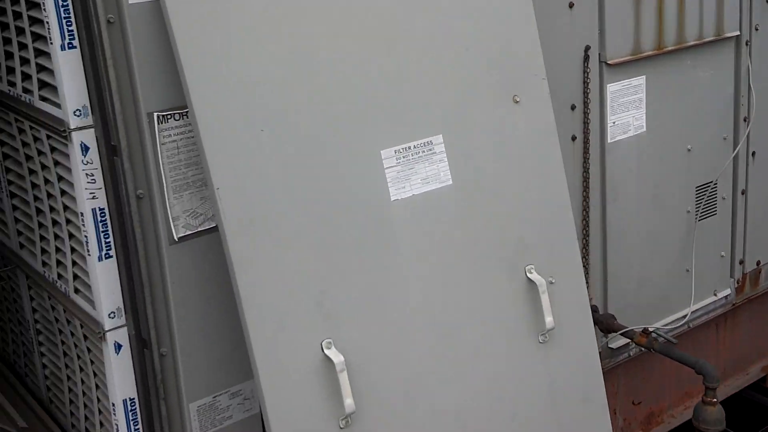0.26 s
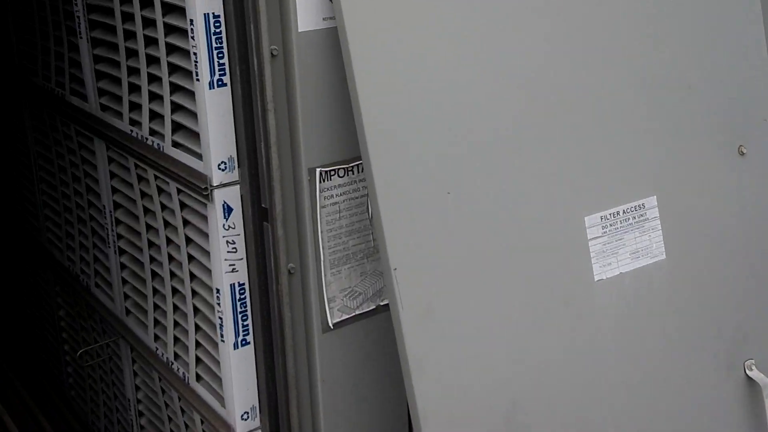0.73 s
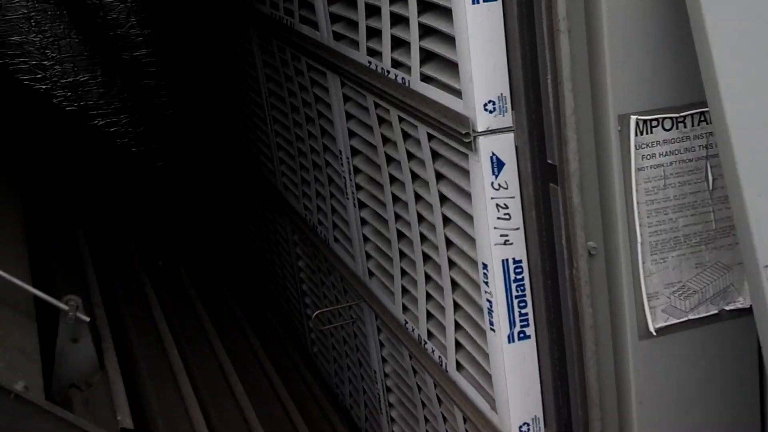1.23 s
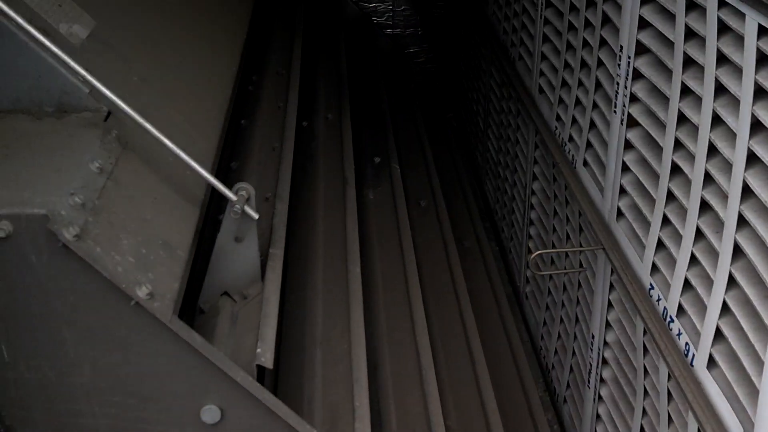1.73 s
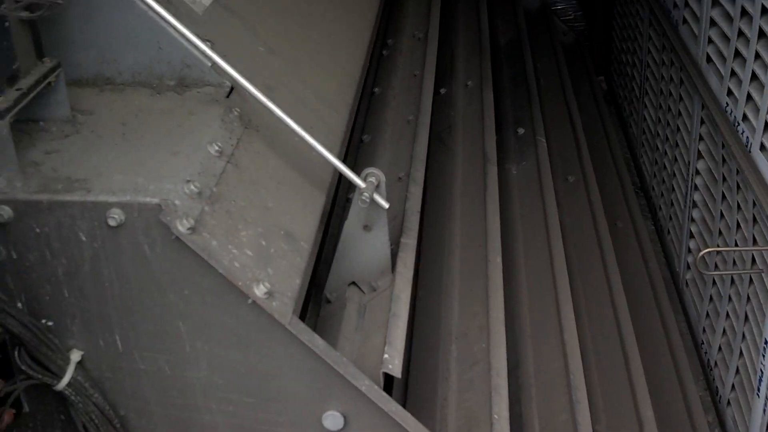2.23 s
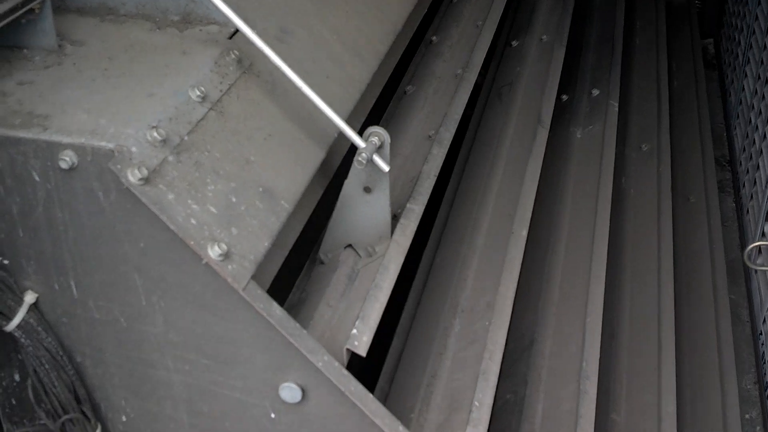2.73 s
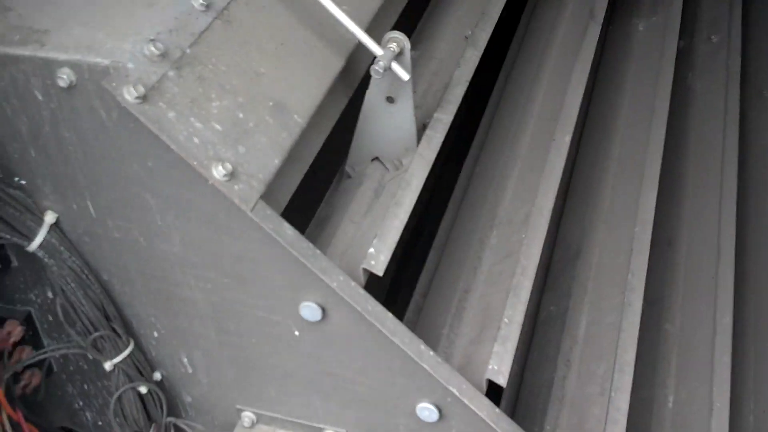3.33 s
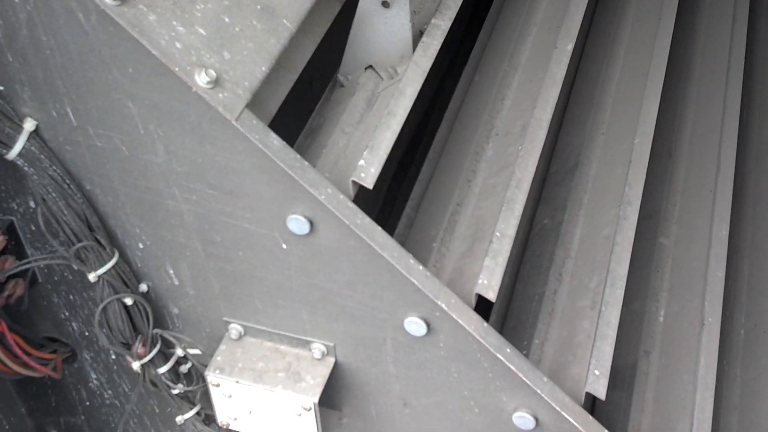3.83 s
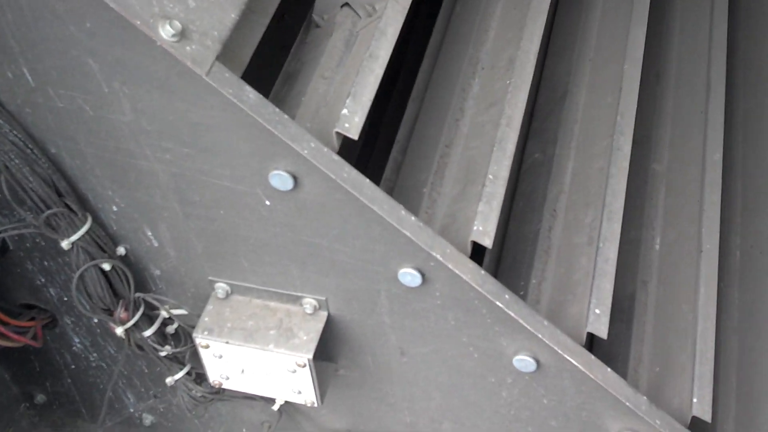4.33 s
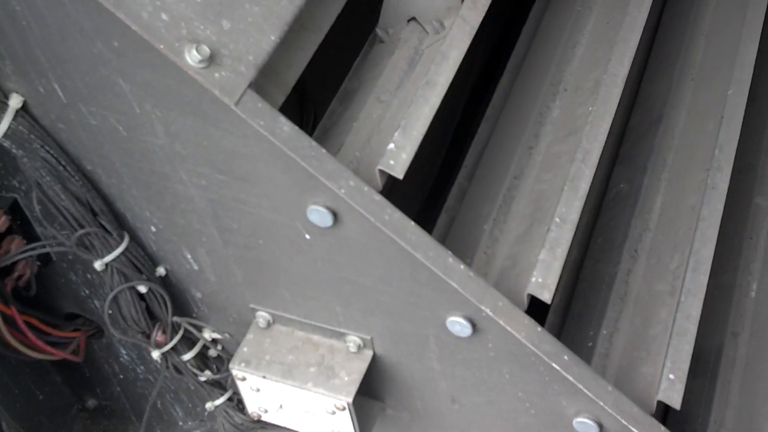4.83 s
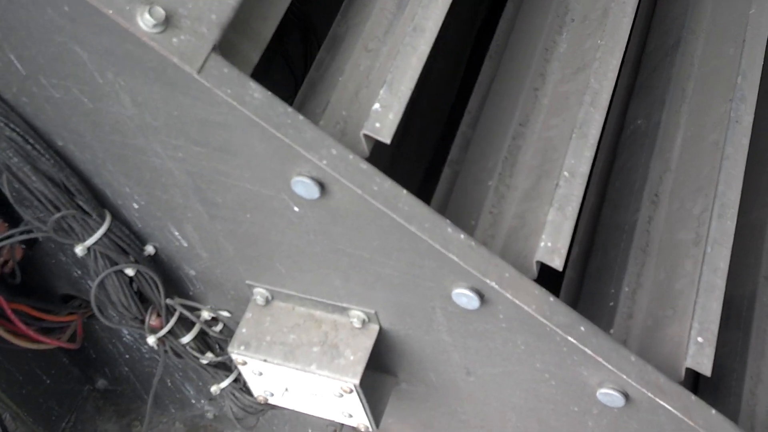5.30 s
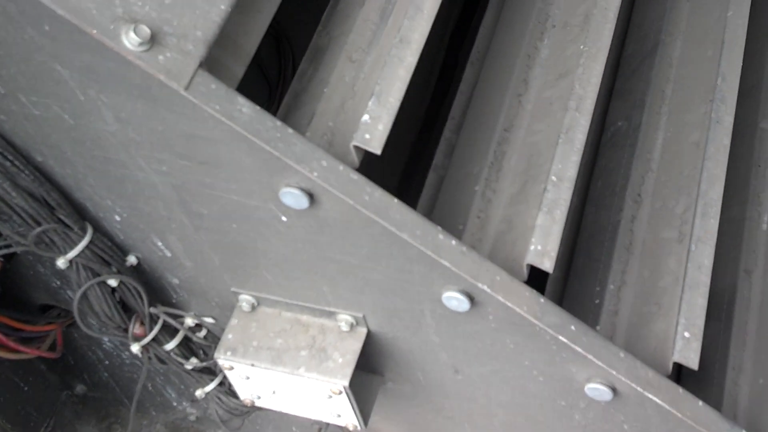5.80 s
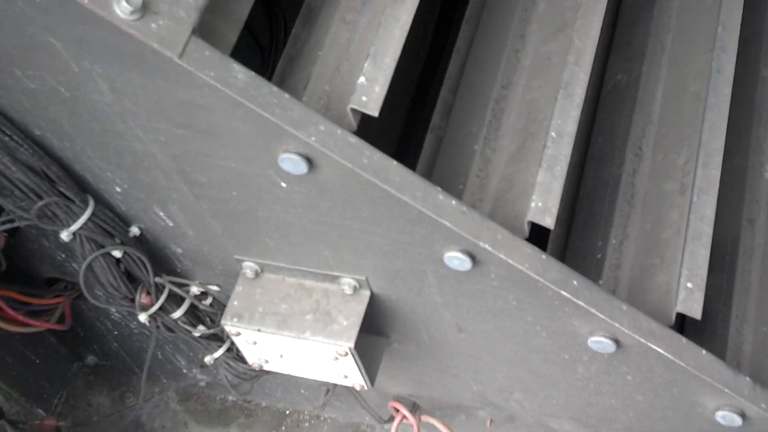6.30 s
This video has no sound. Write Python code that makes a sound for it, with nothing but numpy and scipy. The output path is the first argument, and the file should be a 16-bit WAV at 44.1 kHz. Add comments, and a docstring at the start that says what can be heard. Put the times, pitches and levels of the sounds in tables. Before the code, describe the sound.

Steady machine noise from an air conditioning unit outdoors, heard very close with a handheld stereo microphone. The hollow tone at the start fades while hums and whines swell and shift from side to side. Air rushes through filters and metal dampers with fine hiss. Low wind bumps hit the right side throughout, becoming dense, ragged and popping in the last second and a half; bass is rather thin.

```python
"""A rooftop air conditioner runs steadily while a two-port microphone moves into its open filter bay.
Air, as shaped noise, roars and hisses through filters and dampers; blower and motor are wavering tones
whose levels follow standing waves. The draught buffets the ports with low noise thuds and sharp pops.
A limiter ducks the machine after each loud buffet and lets it swell back; a stereo widener thins the bass."""
import sys
import numpy as np
from scipy import signal
from scipy.fft import rfft, irfft
from scipy.io import wavfile
from scipy.ndimage import uniform_filter1d

SR = 44100
rng = np.random.default_rng(int(sys.argv[2]) if len(sys.argv) > 2 else 0)


def digitize_waveform(pressure):
    """Quantize a signal to 16-bit integers and store it at the path in sys.argv[1].

    Rows of a 2-D input are taken as channels; values are limited to [-1, 1].
    """
    field = np.atleast_2d(pressure).T
    bounded = np.clip(field, -1, 1)
    quanta = np.round(bounded * 32767).astype(np.int16)
    wavfile.write(sys.argv[1], SR, quanta)


N = 288855
TIME, FREQS = np.arange(N) / SR, np.fft.rfftfreq(N, 1 / SR)
LIMITER_WINDOW = 353  # samples, about 8 ms


def amp(db):
    """Decibels to gain."""
    return 10 ** (np.asarray(db) / 20)


def unit(x):
    """Scales to rms 1."""
    return x / np.sqrt(np.mean(x ** 2) + 1e-20)


def curves(rows):
    """Draws each column of a time table as a line over every sample."""
    s, *columns = np.transpose(rows)
    return [np.interp(TIME, s, column) for column in columns]


def over_hz(points):
    """Draws a frequency table over every bin, on a log frequency axis."""
    hz, value = np.transpose(points)
    return np.interp(np.log(FREQS + 1), np.log(hz + 1), value)


def colour(x, spectrum):
    """Filters white sound to the shape of a spectrum, keeping its power."""
    gain = unit(amp(over_hz(spectrum)))
    return irfft(rfft(x) * gain, N)


def white():
    """Unrelated white noise for each port."""
    return rng.standard_normal((2, N))


def wander(rate_hz):
    """Random drift of rms 1 for each port: noise kept below roughly rate_hz."""
    lowpass = np.exp(-(FREQS / rate_hz) ** 2) * (FREQS > 0)
    return unit(irfft(rfft(white()) * lowpass, N))


def related(alike, right_lead):
    """White noise at the two ports, partly shared, the right port ahead by a phase in radians."""
    left, stranger = rfft(white())
    alike = np.clip(alike, -1, 1)
    shared = alike * np.exp(1j * right_lead) * left
    right = shared + np.sqrt(1 - alike ** 2) * stranger
    return irfft([left, right], N)


def short_level(x):
    """Running rms over about 8 ms, as the limiter senses it."""
    return np.sqrt(abs(uniform_filter1d(x ** 2, LIMITER_WINDOW)) + 1e-12)


def tone(hz, shared, opposed, lead, db, waver_hz, tremble_db):
    """A strong machine tone; its opposed part leads by some radians, and moving air makes the whole tremble."""
    phase = 2 * np.pi * np.cumsum(hz + waver_hz * wander(3.5)[0]) / SR
    opposite_signs = np.array([[1], [-1]])
    ports = shared * np.cos(phase) + opposite_signs * opposed * np.cos(phase + lead)
    return np.sqrt(2) * amp(db + tremble_db * wander(29)[0]) * ports


# steady draught on the microphone, before the layer trims: time_s, level_db
DRAUGHT_LEVEL = [(0.0, -22), (0.55, -25.5), (1.1, -21), (1.4, -22.5), (1.7, -20.5), (2.2, -24.5),
                 (2.8, -23), (3.3, -25), (4.0, -26), (4.6, -22), (5.5, -18), (6.55, -18)]
# spectrum shape of the eddies' low rumble, also used by the buffets: frequency_hz, relative_db_per_hz
RUMBLE_SPECTRUM = [(10, -45), (25, -18), (45, -18.5), (65, -19), (90, -2.5), (130, -2), (220, -1.5),
                   (400, -12), (750, -32), (1500, -46.5), (8000, -85)]
# spectrum shape of the eddies' flutter, also used by the buffets: frequency_hz, relative_db_per_hz
FLUTTER_SPECTRUM = [(20, -42), (150, -20), (350, 4), (550, -1), (750, -12), (1150, -25), (1700, -25.5),
                    (3000, -65), (12000, -75)]


def draught(rumble_db=2.0, lump_db=2.5, flutter_db=-15, alike=0.55, right_lead=0.47):
    """Small eddies rumble on both ports all the time; the right port flutters more."""
    level = amp(curves(DRAUGHT_LEVEL)[0])
    lumps = amp(lump_db * wander(14.0))
    rumble = colour(unit(related(alike, right_lead) * lumps) * level, RUMBLE_SPECTRUM)
    flutter = colour(unit(white()) * level, FLUTTER_SPECTRUM)
    port_gain = amp([[-5], [2]])  # left, right
    return amp(rumble_db) * rumble + amp(flutter_db) * port_gain * flutter


# the strongest buffets; lengths under 6 ms play as 6 ms, and flutter is before its trim:
# centre_s, port (0 left, 1 right), length_s, thud_peak_db (8 ms level), flutter_db
BUFFETS = [(0.267, 1, 0.0073, -14, -22), (0.296, 1, .005, -9, -15), (0.611, 1, 0.0054, -10, -23.5),
           (0.636, 1, 0.0047, -20, -33), (0.698, 1, .005, -13, -30), (0.726, 1, 0.0051, -5, -28),
           (0.764, 1, 0.0097, -10, -31.5), (0.912, 1, 0.024, -10, -30), (0.962, 1, 0.0053, -8.5, -28),
           (1.045, 1, 0.0045, -14, -23), (1.118, 1, 0.0074, -4, -17), (1.175, 1, 0.0045, -9.5, -34),
           (1.264, 1, 0.0097, -7.5, -24.5), (1.289, 1, 0.0084, -14, -24), (1.316, 1, 0.011, -10.5, -11.5),
           (1.323, 0, 0.0093, -5.5, -11), (1.772, 1, .005, -31, -13), (1.803, 1, 0.0099, -9.5, -21),
           (1.948, 1, 0.0062, -15.5, -24), (2.109, 1, 0.0082, -12.5, -36), (2.308, 1, 0.037, -16.5, -18.5),
           (2.385, 1, 0.014, -14, -23), (2.447, 1, 0.0055, -11.5, -8.5), (2.489, 1, 0.0077, -7, -12),
           (2.554, 1, .005, -11, -10.5), (2.698, 1, 0.0035, -15, -23.5), (2.729, 1, 0.015, -12, -20),
           (2.76, 1, .015, -15, -17), (2.846, 1, 0.047, -11, -19), (2.881, 1, 0.017, -9, -20),
           (3.027, 1, 0.0071, -20, -15), (3.069, 1, 0.015, -20, -20), (3.14, 1, 0.0088, -5.5, -16),
           (3.213, 1, 0.012, -11, -21), (3.454, 1, 0.0055, -15, -28), (3.515, 1, 0.018, -16.5, -28),
           (3.633, 1, 0.0045, -14, -26), (3.668, 1, 0.0052, -8, -11), (3.895, 0, 0.008, -6, -18),
           (4.012, 1, .005, -6.5, -18), (4.046, 1, 0.0092, -9, -33), (4.15, 1, .005, -6.5, -36),
           (4.386, 1, 0.014, -7, -28), (4.459, 1, 0.045, -11, -18), (4.622, 1, 0.012, -7, -17.5),
           (4.729, 1, 0.0067, -2.5, -12), (4.758, 1, 0.0055, -15.5, -33), (4.797, 1, 0.0085, -9.5, -16),
           (4.92, 1, 0.047, -15, -19.5), (5.087, 1, 0.016, -9, -31), (5.146, 1, 0.021, -14, -28),
           (5.176, 1, 0.018, -4, -11), (5.224, 1, 0.019, -2, -5.5), (5.307, 1, 0.03, -6, -4),
           (5.37, 1, 0.014, -5.5, -15), (5.487, 1, 0.023, -13, -21), (5.545, 1, 0.024, -24, -15),
           (5.65, 1, 0.013, -10, -13), (5.766, 1, 0.007, 0, -4), (5.835, 1, 0.026, -19, -16),
           (5.959, 1, 0.006, -3.5, -5.5), (6.018, 1, 0.0025, -12, -14), (6.083, 1, 0.013, -9, -13),
           (6.093, 1, 0.013, -3, -5), (6.144, 1, 0.0065, -4, -18), (6.204, 1, 0.013, -10, -17),
           (6.287, 1, 0.0046, -7, -23), (6.314, 1, 0.018, -3.5, -10), (6.338, 1, 0.014, -7, -7),
           (6.365, 1, 0.0036, -7, -5.5), (6.421, 1, 0.0083, -14, -18), (6.479, 1, 0.0036, -11, -23),
           (6.532, 1, 0.018, -11, -16)]


def buffets(flutter_trim_db=-1, spike_db=4, tail_db=-14, tail_s=0.033, flutter_length=0.76):
    """Each larger eddy hits one port: a low thud with a ragged flutter on top, and a soft rumbling wake."""
    out = np.zeros((2, N))
    low = colour(white(), RUMBLE_SPECTRUM)
    ragged = colour(white() * amp(spike_db * wander(260)), FLUTTER_SPECTRUM)
    for s, port, length_s, thud_db, flutter_db in BUFFETS:
        side, near = int(port > .5), abs(TIME - s) < .15
        t = TIME[near] - s
        bell = 2 ** (-2 * (t / max(length_s, .006)) ** 2)
        wake = amp(tail_db) * (t > 0) * np.exp(-abs(t) / tail_s)
        thud = low[side, near] * np.maximum(bell, wake)
        thud = thud / short_level(thud).max()
        # the flutter's bell is a share of the thud's length
        shape = np.maximum(bell ** (1 / flutter_length ** 2), wake)
        flutter = unit(ragged[side, near] * shape) * np.sqrt(np.mean(shape ** 2))
        out[side, near] += amp(thud_db) * thud + amp(flutter_db + flutter_trim_db) * flutter
    return out


# sharp pops of air in the right port; level drives the swing before trim and envelope:
# start_s, level_db, pitch_hz
AIR_POPS = [(0.7188, 5, 820), (2.4325, -4, 590), (2.5002, 4, 726), (2.5552, 5, 500), (2.8741, 10, 536),
            (3.0607, 5.5, 680), (3.6567, -8, 640), (4.623, -7, 576), (4.7277, 0, 457), (5.203, -3, 330),
            (5.217, 8, 647), (5.231, 14, 590), (5.287, 11, 630), (5.3015, 9, 705), (5.333, 9, 520),
            (5.6414, 7.5, 750), (5.7651, 8.5, 525), (5.9122, 8, 540), (5.9554, 12.5, 806),
            (5.9614, 11, 453), (6.078, 12, 480), (6.0833, 9, 496), (6.0924, 14.5, 490), (6.2125, 9.5, 620),
            (6.304, 3, 580), (6.307, 12, 535), (6.3634, 10, 424), (6.3805, 8, 720), (6.3947, 8, 500),
            (6.4172, 5, 637), (6.516, 5, 680)]


def pops(trim_db=1.0, decay_s=0.00065, rise_s=0.00072):
    """An eddy breaks in the right port: a steep pressure swing that dies within a cycle or two."""
    out = np.zeros((2, N))
    t = np.arange(SR // 50) / SR
    envelope = np.exp(-t / decay_s) * (1 - np.exp(-(t / rise_s) ** 2))
    for s, level_db, hz in AIR_POPS:
        start = round(s * SR)
        swing = np.sin(2 * np.pi * hz * t) * envelope
        out[1, start:start + len(t)] += amp(level_db + trim_db) * swing
    return out


# brief spits of hiss, and at 1.3 s a knock and scrape as the microphone brushes the filter frame; level before
# the rise and fade: start_s, centre_hz, width_hz, fade_s, level_db
RUSTLES_AND_SPITS = [(0.63, 14630, 3000, .015, -53), (1.295, 1500, 1200, 0.041, -26), (1.32, 3700, 2200, .05, -37),
                     (1.672, 15200, 700, .012, -44), (1.72, 6500, 1200, 0.036, -51),
                     (1.725, 12000, 6000, 0.1, -53), (1.8, 13300, 6000, 0.023, -49),
                     (1.878, 14000, 6000, .02, -48), (1.95, 13500, 5000, 0.11, -54),
                     (2.16, 8500, 6000, 0.046, -45), (3.63, 7500, 3000, .025, -48), (4.43, 7500, 3000, .04, -48),
                     (5.69, 4000, 2500, .06, -42)]


def spits(rise_s=0.0052, grain_db=1.5, grain_hz=250):
    """Short grainy bursts, each in its own band: spits of hiss, and a knock and scrape at 1.3 s; a quick rise
    and a slower fade."""
    out = np.zeros((2, N))
    grains = rfft(white() * amp(grain_db * wander(grain_hz)[0]))
    for s, hz, width_hz, fade_s, level_db in RUSTLES_AND_SPITS:
        t = np.maximum(TIME - s, 0)
        band = unit(irfft(grains * np.exp(-2 * ((FREQS - hz) / width_hz) ** 2), N))
        out += amp(level_db) * band * np.minimum(t / rise_s, 1) * np.exp(-t / fade_s)
    return out


# one short swish that falls in pitch, level before the trims: time_s, centre_hz, level_db
SWISH_GLIDE = [(1.29, 9760, -71.5), (1.33, 8400, -36.5), (1.355, 7000, -42), (1.385, 5840, -35.5),
               (1.44, 5500, -60)]


def swish(trim_db=-3.5, width_hz=1900, grain_db=1.8):
    """A grainy band of hiss slides down, stronger at the left port: slow noise rides a falling carrier."""
    hz, level_db = curves(SWISH_GLIDE)
    sounding = (TIME > SWISH_GLIDE[0][0]) & (TIME < SWISH_GLIDE[-1][0])
    port_gain = amp([[2], [-2]])  # left, right
    level = amp(level_db + trim_db + grain_db * wander(110)[0]) * port_gain
    carrier = np.cos(2 * np.pi * np.cumsum(hz) / SR)
    return sounding * level * wander(width_hz) * carrier


# weaker tones of shafts, belt and motors, level before the trim: pitch_hz, level_db
WEAK_TONES = [(113.0, -39), (298.1, -52), (480.5, -53), (529.6, -48), (588.1, -57.5), (824.3, -68),
              (871.4, -60), (968.3, -57.5), (974.4, -58.5), (1035.6, -59.5), (1094.2, -74), (1185.0, -69),
              (2010.0, -69), (2129.8, -74), (2250.9, -62), (4125.0, -74)]


def weak_tones(trim_db=6.0, fade_db=2.0, port_spread=0.34):
    """Lesser lines swell and fade as the microphone moves, their phases drifting a little between ports."""
    out = np.zeros((2, N))
    for hz, level_db in WEAK_TONES:
        fade, drift = wander(1.47)
        phase = 2 * np.pi * (hz * TIME + rng.random()) + drift + port_spread * wander(0.2)
        out += amp(level_db + fade_db * fade) * np.cos(phase)
    return np.sqrt(2) * out * amp(trim_db)


# level of the hollow cabinet resonance: time_s, level_db
CABINET_LEVEL = [(0, -30.5), (.7, -35), (1.3, -39.5), (2.0, -53), (3.0, -55), (6.55, -42.5)]
# spectrum shape of that resonance: frequency_hz, relative_db_per_hz
CABINET_SPECTRUM = [(400, -49), (590, -3.5), (655, 3.5), (720, -5.5), (800, -1.5), (1100, -61)]


def hollow(alike=0.9):
    """The air flow excites a broad cabinet resonance, here a band of noise nearly shared by the ports."""
    return colour(related(alike, 0), CABINET_SPECTRUM) * amp(curves(CABINET_LEVEL)[0])


CROSSING_S = 0.051  # time scale of a sign turn


def standing(path, crossings):
    """Standing-wave gains: the part both ports share, and the opposed part, turning sign at each crossing."""
    shared_db, opposed_db = curves(path)
    turns = np.prod([np.tanh((s - TIME) / CROSSING_S) for s in crossings], axis=0)
    return amp(shared_db), amp(opposed_db) * turns


# the whine's centre pitch: time_s, pitch_hz
WHINE_PITCH_PATH = [(0.0, 946.8), (1.3, 946.8), (1.9, 944.8), (6.55, 944.9)]
# the whines' waves are short enough to differ between the ports; before trim: time_s, shared_db, opposed_db
WHINE_LEVELS = [(0.0, -38, -33), (0.28, -31.5, -31), (1.05, -29, -39), (1.3, -29.5, -55), (1.6, -48, -43),
                (1.95, -46, -40.5), (2.35, -37.5, -43), (3.2, -31.5, -52), (4.0, -31.5, -44),
                (4.4, -42, -46), (4.7, -43, -30.5), (4.95, -36.5, -33), (5.6, -42.5, -32), (6.55, -61, -34)]
# the same for the upper whine, before trim: time_s, shared_db, opposed_db
UPPER_WHINE_LEVELS = [(0.0, -43, -37), (0.55, -45, -47), (1.75, -39.5, -53), (2.0, -46.5, -48.0),
                      (4.5, -37, -45), (5.15, -39.5, -34), (6.3, -36.5, -46.5), (6.55, -38, -33)]
# where the microphone crosses a node or crest of the whine, so the louder port changes sides: time_s
WHINE_TURNS = [4.6, 4.65]
# the same for the upper whine: time_s
UPPER_WHINE_TURNS = [4.6]
# standing-wave level of the ring, before trim: time_s, shared_db
RING_LEVEL = [(0.0, -57), (0.65, -51), (1.5, -54.5), (2.36, -51), (3.7, -53.5), (4.55, -47), (5.2, -58),
              (5.7, -51.5), (6.55, -60)]
UPPER_WHINE_HZ, RING_HZ = 1064.6, 1535.6  # the ring is the centre of a close pair
BEATS_PER_S, BEAT_PEAK_S = 5.46, 2.36


def motor():
    """Slot tones about twice the mains frequency apart, and a thin beating ring above them."""
    whine = tone(curves(WHINE_PITCH_PATH)[0], *standing(WHINE_LEVELS, WHINE_TURNS),
                 lead=2.75, db=-0.4, waver_hz=0.95, tremble_db=1.88)
    upper = tone(UPPER_WHINE_HZ, *standing(UPPER_WHINE_LEVELS, UPPER_WHINE_TURNS),
                 lead=2.6, db=0.1, waver_hz=0.37, tremble_db=0.0)
    ring = tone(RING_HZ, amp(curves(RING_LEVEL)[0]), amp(-55), lead=2.1, db=4.5, waver_hz=0.5, tremble_db=2.0)
    beat = np.sqrt(2) * np.cos(np.pi * BEATS_PER_S * (TIME - BEAT_PEAK_S))
    return whine + upper + ring * beat


# standing-wave level of the blower drone along the microphone's path: time_s, shared_db
DRONE_LEVEL = [(0.0, -29), (0.22, -15.5), (0.5, -20.5), (0.9, -26), (3.2, -40.5), (3.9, -26.5),
               (4.3, -38.5), (6.55, -32)]
# level of the drone's overtone: time_s, shared_db
OVERTONE_LEVEL = [(0.0, -29), (0.35, -24.5), (1.3, -28.5), (2.3, -33.5), (3.0, -34), (6.55, -40)]
# level of the lower blade hum, before trim: time_s, shared_db
BLADE_LEVEL = [(0.0, -31.5), (1.3, -33.5), (2.3, -32), (3.3, -36), (3.7, -31.5), (5.1, -32), (6.55, -34.5)]
# level of the upper blade hum, before trim: time_s, shared_db
HUM_LEVEL = [(0.0, -23.5), (0.25, -43), (1.3, -44), (2.1, -36), (3.15, -31.5), (3.55, -26.5), (4.5, -25.5),
             (5.2, -25), (5.6, -28.5), (6.55, -30.5)]
DRONE_HZ, OVERTONE_HZ, BLADE_HZ, HUM_HZ = 148.0, 222.7, 360.7, 435.5


def blower():
    """Low drone with its overtone, and two hums of the blades: long waves, nearly alike at both ports."""
    drone = tone(DRONE_HZ, amp(curves(DRONE_LEVEL)[0]), amp(-43),
                 lead=3.9, db=0.0, waver_hz=0.58, tremble_db=2.2)
    overtone = tone(OVERTONE_HZ, amp(curves(OVERTONE_LEVEL)[0]), amp(-56),
                    lead=1.5, db=0.0, waver_hz=0.98, tremble_db=3.0)
    blade = tone(BLADE_HZ, amp(curves(BLADE_LEVEL)[0]), amp(-56),
                 lead=1.2, db=-1.5, waver_hz=1.32, tremble_db=2.0)
    hum = tone(HUM_HZ, amp(curves(HUM_LEVEL)[0]), amp(-45),
               lead=-3.0, db=-1.5, waver_hz=1.6, tremble_db=2.7)
    return drone + overtone + blade + hum


# the nearly constant air flow through the unit, before the trims: time_s, roar_db, hiss_db
AIR_LEVELS = [(0.0, -36.5, -42.5), (1.3, -38, -44.5), (2.0, -39.5, -44.5), (2.33, -39, -44),
              (3.4, -40.5, -45), (5.1, -39, -42.5), (5.6, -39.2, -42.5), (6.55, -41, -45)]
# spectrum shape of the roar: frequency_hz, relative_db_per_hz
ROAR_SPECTRUM = [(20, -32), (100, -4.5), (300, 2.5), (450, -0.5), (560, -9), (660, -9.5), (800, -8.5),
                 (1150, -12), (1700, -14), (2200, -16.5), (3400, -25.5), (6000, -40.5), (16000, -67)]
# likeness of the roar at the two ports: frequency_hz, likeness (-1 to 1)
ROAR_LIKENESS = [(100, 1), (450, 0.97), (800, 0.61), (1200, 0.51), (1700, -0.38), (2300, -0.089),
                 (4000, 0.016)]
# how far the roar reaches the right port first: frequency_hz, lead_rad
ROAR_RIGHT_LEAD = [(60, .15), (200, 0.05), (700, 0.43), (1200, 0.38), (2500, 0.039)]
# spectrum shape of the hiss: frequency_hz, relative_db_per_hz
HISS_SPECTRUM = [(100, -48), (1000, -31), (2200, -3.5), (3200, 3), (4000, -0.5), (4800, -5.5), (6200, -8),
                 (7600, -9), (9000, -13.5), (10500, -18), (12000, -34.5), (15500, -21)]
# hiss at the right port against the left: frequency_hz, gain_db
HISS_RIGHT_GAIN = [(1500, 4.5), (3400, -6), (9000, -0.5), (12000, -3.5), (15000, 1)]
# level of the fine sizzle against the hiss before its trim: time_s, level_db
SIZZLE_BALANCE = [(0.0, -14), (0.44, -14), (0.68, -11), (0.84, -14), (1.04, -9), (1.37, -12), (1.73, -14),
                  (2.13, -16), (6.55, -13.5)]
# spectrum shape of the sizzle: frequency_hz, relative_db_per_hz
SIZZLE_SPECTRUM = [(100, -50), (5000, -30), (9000, -6), (11000, -5.5), (13000, 4), (15500, -4.5)]


def air(roar_trim_db=13, hiss_trim_db=3.0, surge_db=0.55, flicker_db=.5, roar_gust_db=-0.08, sizzle_gust_db=-1.5):
    """A dull roar from inside the cabinet; hiss and sizzle from the filter and damper edges."""
    roar_db, hiss_db = curves(AIR_LEVELS)
    # long waves reach both ports nearly together
    roar = colour(related(over_hz(ROAR_LIKENESS), over_hz(ROAR_RIGHT_LEAD)), ROAR_SPECTRUM)
    roar = roar * amp(roar_db + roar_trim_db + roar_gust_db * wander(5.9)[0])
    left, right = rfft(colour(white(), HISS_SPECTRUM))
    hiss = irfft([left, right * amp(over_hz(HISS_RIGHT_GAIN))], N)
    hiss = hiss * amp(hiss_db + hiss_trim_db + flicker_db * wander(60))
    sizzle_db = hiss_db + curves(SIZZLE_BALANCE)[0] + sizzle_gust_db * wander(20)[0]
    sizzle = colour(white(), SIZZLE_SPECTRUM) * amp(sizzle_db)
    surge = amp(surge_db * wander(10.0)[0])
    return surge * (roar + hiss + sizzle)


def scene():
    """Pressure at the two microphone ports."""
    wind = draught() + buffets() + pops()
    machine = spits() + swish() + weak_tones() + hollow() + motor() + blower() + air()
    return wind + machine


CEILING_DB, RECOVERY_DB_PER_S = -13.5, 8.5
START_DUCK_DB = 10.5  # how far the limiter is already down at the start


def limiter(x):
    """Sound over the ceiling ducks both ports at once; the gain then swells back at a steady rate."""
    over_db = np.maximum(20 * np.log10(short_level(x).max(0)) - CEILING_DB, 0)
    recovered = RECOVERY_DB_PER_S * TIME
    # hold the deepest duck so far, less the recovery since
    duck_db = np.maximum.accumulate(np.maximum(over_db + recovered, START_DUCK_DB)) - recovered
    return x * amp(-uniform_filter1d(duck_db, size=130))


PORT_DELAY = 16  # samples
EDGE_HZ = 15560  # top of the band


def record(dry):
    """Limits, subtracts the delayed other port, which widens the image and thins the bass, then band-limits."""
    dry = limiter(dry) * signal.windows.tukey(N, .002)
    wide = dry - np.roll(dry[::-1], PORT_DELAY, axis=1)
    lowpass = signal.firwin(1023, EDGE_HZ, window=("kaiser", 9), fs=SR)
    return signal.oaconvolve(wide, lowpass[None], "same")


dry = scene()
out = record(dry)
digitize_waveform(out)
```